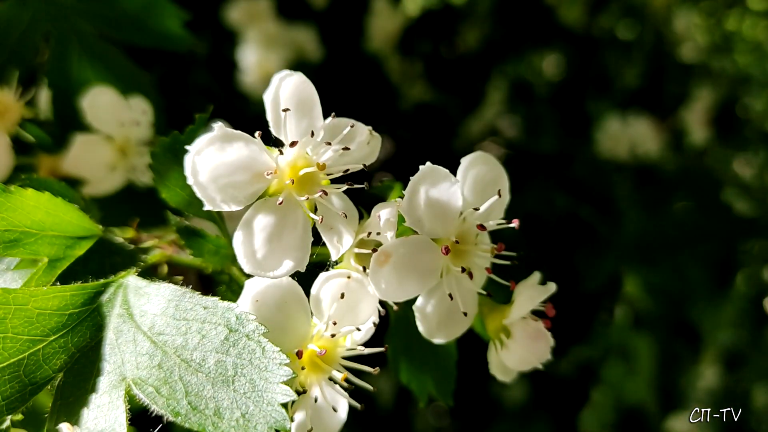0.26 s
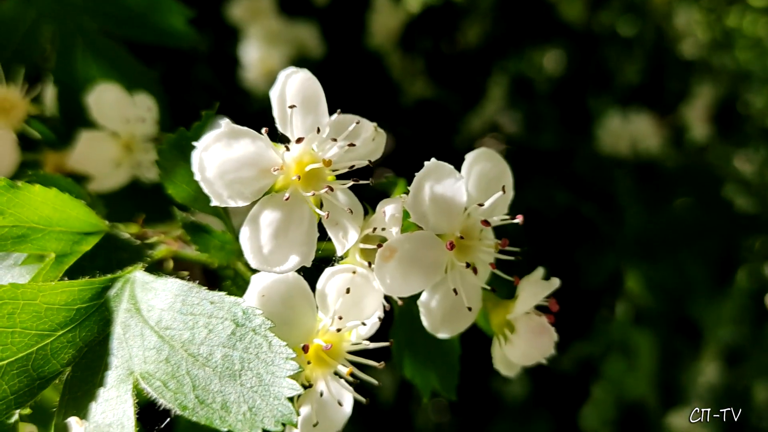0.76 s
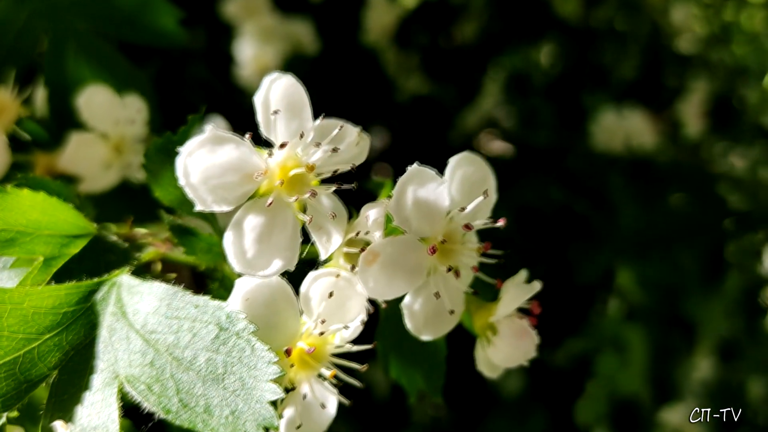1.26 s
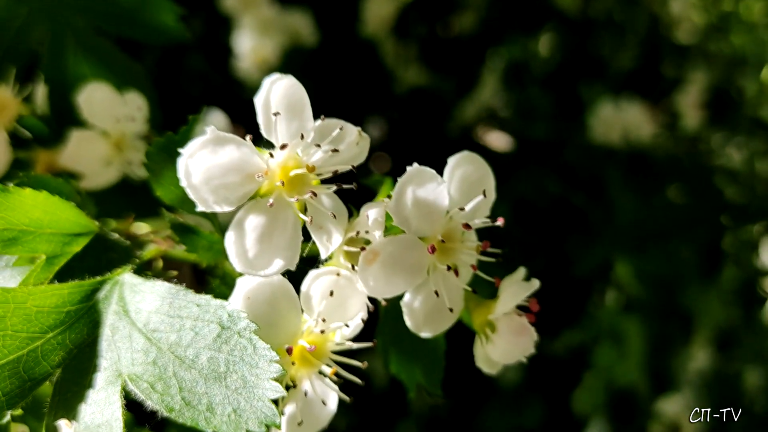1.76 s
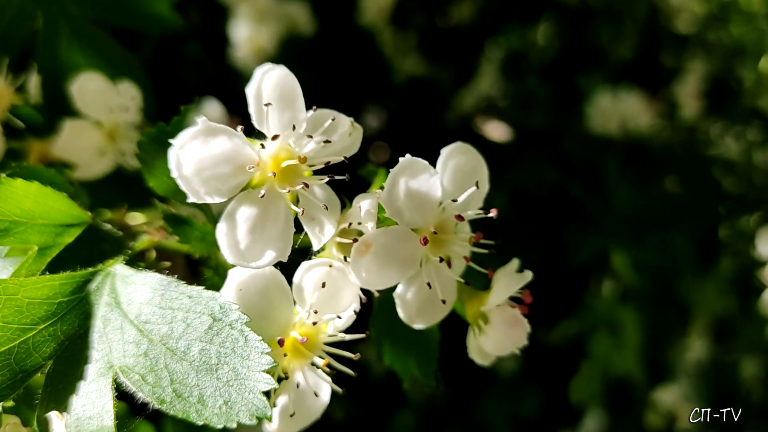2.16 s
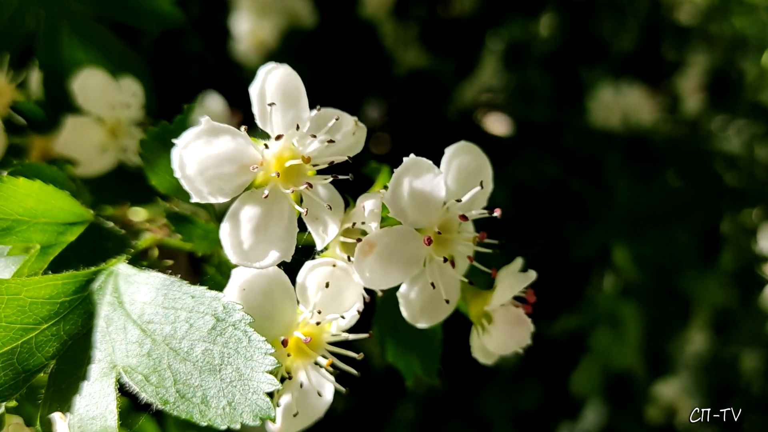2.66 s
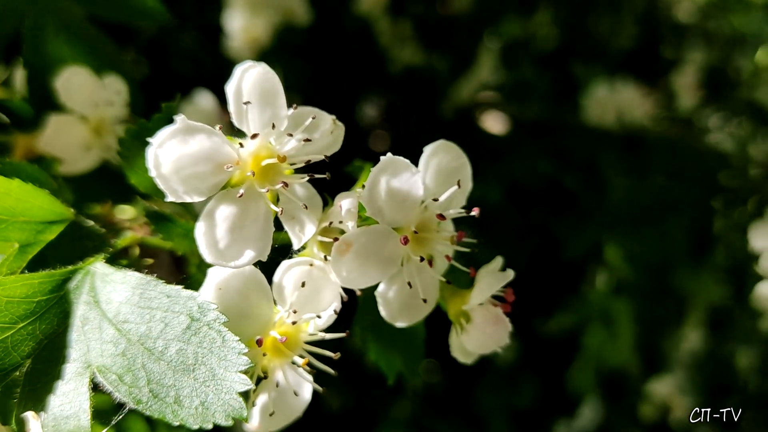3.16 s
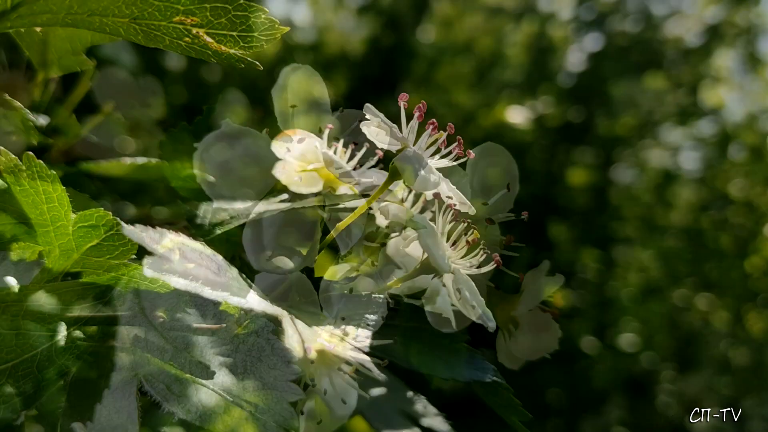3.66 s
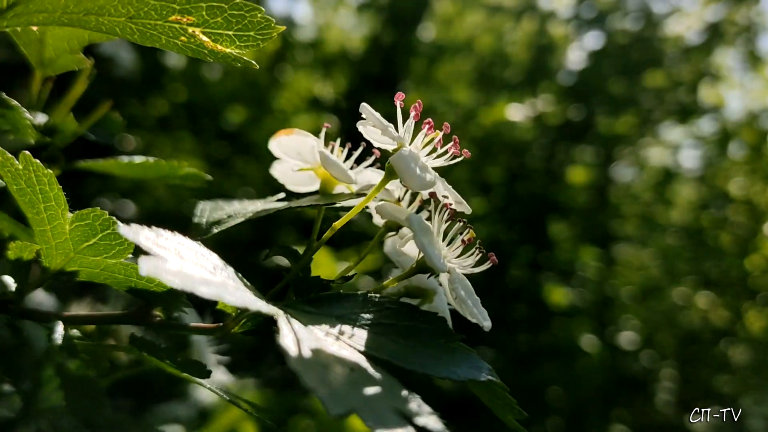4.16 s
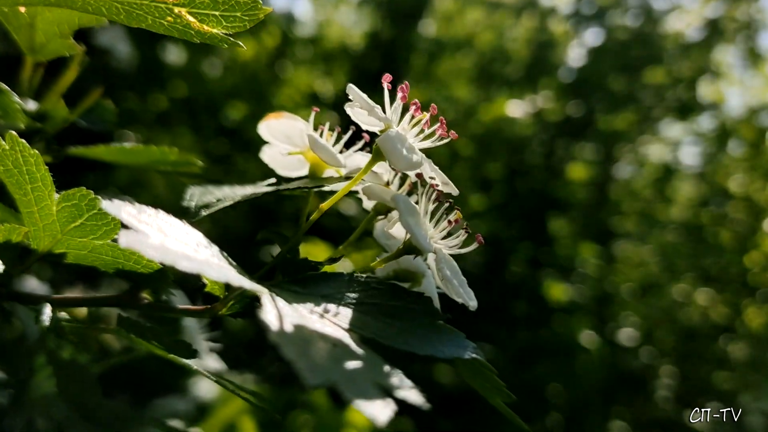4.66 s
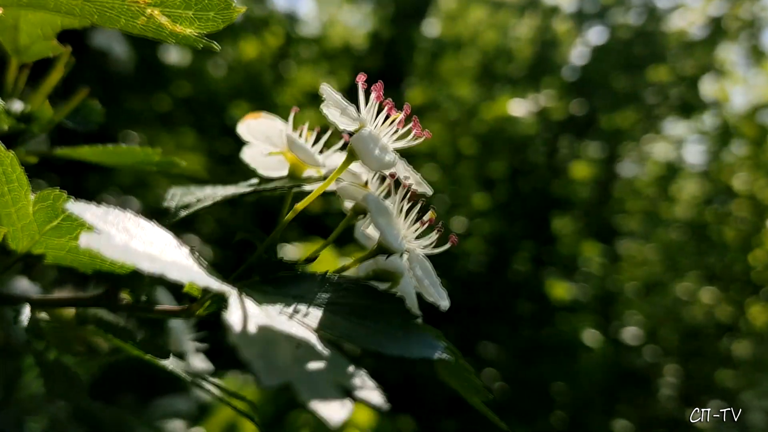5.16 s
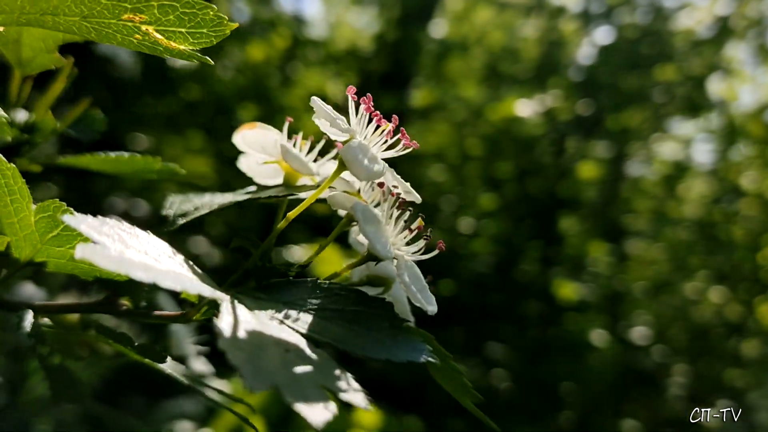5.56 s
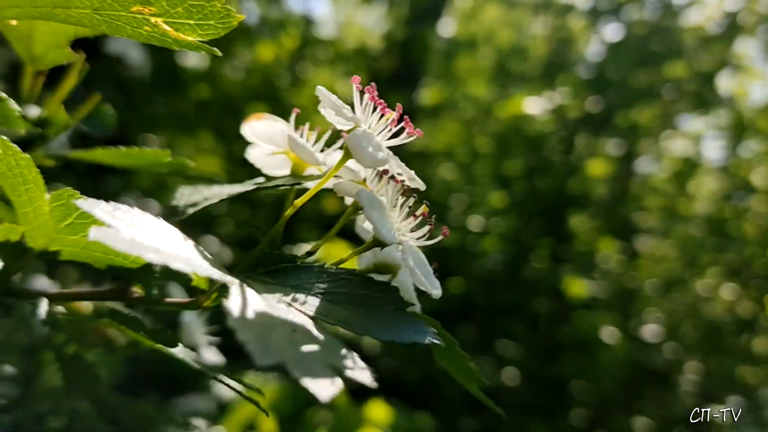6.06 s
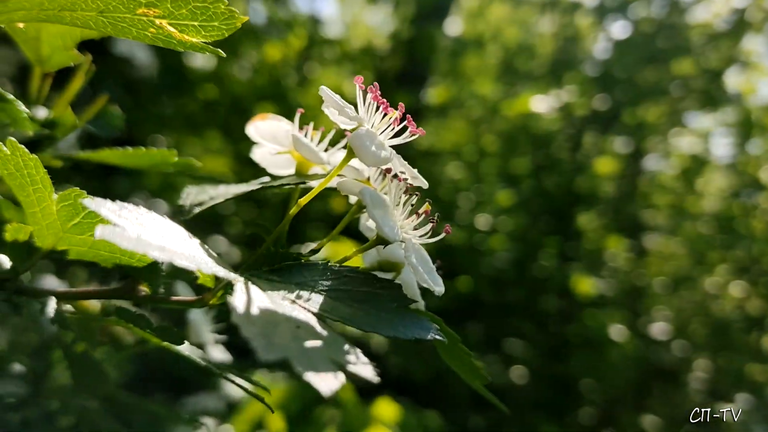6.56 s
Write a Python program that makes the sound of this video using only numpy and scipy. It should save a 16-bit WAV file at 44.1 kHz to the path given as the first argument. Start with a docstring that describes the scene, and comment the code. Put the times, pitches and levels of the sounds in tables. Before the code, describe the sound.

Close stereo outdoor sound: first a bubbling, splashing brook, dense and bright, fading out just after two seconds. Behind it opens a calm woodland with a soft low murmur, a faint distant hum and fine irregular ticking like drops on leaves. A warbling thrush sings quick whistles and buzzy trills with long tree echoes, joined by a few tiny high chips and peeps. Midway, a soft thud hits close on the left.

```python
"""A shallow stream rushes over stones close by: bursts of filtered noise and clicks make its spray and
splashes, decaying rising sines its bubbles and gurgles. It fades away and leaves a quiet wood, where
gliding sines make a warbling thrush and a small peeping bird, and echoes return from the trees.
Random ticks patter over soft noise and a faint, far hum; one fat drop, a sine of sagging pitch,
knocks right beside the left port of the microphone."""
import sys
import numpy as np
from scipy import signal
from scipy.fft import rfft, irfft, next_fast_len
from scipy.io import wavfile

SR = 44100
rng = np.random.default_rng(int(sys.argv[2]) if len(sys.argv) > 2 else 0)


def persist_wave(psi):
    """Save psi, clipped to +-1, as 16-bit WAV."""
    counts = np.round(np.clip(psi, -1, 1) * 32767).astype(np.int16)
    wavfile.write(sys.argv[1], SR, np.atleast_2d(counts).T)


N = 300321
T = np.arange(N) / SR  # time of every sample, s

# still air of the wood: colour [f/Hz, relative level/dB]
AIR_COLOUR = [(12, -31), (20, 7), (32, -3), (75, -0.5), (118, -13), (211, -6), (327, -9.5), (359, -9),
              (557, -12), (611, -13.5), (752, -13.5), (1690, -21), (1850, -19), (2440, -21), (5000, -70),
              (6500, -59), (11000, -120)]
# likeness of the air at the two ports [f/Hz, coherence]
AIR_COHERENCE = [(30, 0.52), (100, 0.99), (300, 0.71), (650, 0.15), (1400, 0), (15000, 0)]
# lean of the air to one port [f/Hz, left minus right/dB]
AIR_LEAN = [(60, 6), (300, 6.5), (700, 4.5), (2400, 3), (6000, 8)]
AIR_DB = -47

# lines of the far hum, before its swell [f/Hz, level/dB rms]
HUM_LINES = [(364, -61.5), (428, -67), (465, -66.5), (578, -68)]
# slow swell of the hum [t/s, gain/dB]
HUM_SWELL = [(2.3, -26), (3.6, -0.5), (4.6, -4), (5.8, 1), (6.8, -0.5)]

# course of the fine patter, before its overall gain [t/s, level/dB]
PATTER_COURSE = [(2.4, -56), (2.78, -53.5), (4.27, -62.5), (5.11, -61.5), (5.89, -61), (6.33, -66.5),
                 (6.8, -61)]
# colour of a drop on a leaf [f/Hz, gain/dB]
LEAF_COLOUR = [(800, -33), (2500, 2), (4500, -3), (6000, 0), (9000, 2), (12000, -4), (15000, -4.5)]
# nearer drops, before their treble filter [t/s, level/dB, left minus right/dB]
NEAR_DROPS = [(3.122, -32, 2.5), (3.3411, -32, -8), (3.627, -31.5, 1), (4.02, -30, 1), (4.143, -33, 9),
              (4.3795, -34, -3), (4.475, -29.5, 20), (4.804, -34.5, 4), (5.117, -35, 3), (5.142, -35, 2.5),
              (5.168, -34, 3), (6.018, -37, 12), (6.045, -30.5, 16), (6.5417, -33, 0)]
PATTER_GAIN_DB = 5
TICK_NOISE_S, TICK_NOISE_DB = 0.007, 3  # a short, soft noise with each tick, gone within milliseconds

KNOCK_S, KNOCK_DB, KNOCK_FADE_DB_PER_S = 4.4762, -22, 582  # the fat drop's thud
KNOCK_FIRST_HZ, KNOCK_LAST_HZ, KNOCK_SAG_S = 506, 151, 0.0027
PLOP_DELAY_S, PLOP_DB, PLOP_HZ = 0.0011, -33, 800  # the air it traps

# the thrush's pure notes, before flutter
# [t/s, length/s, level/dB, first f/Hz, middle f/Hz, last f/Hz]
THRUSH_WHISTLES = [(2.405, .045, -45, 1770, 1830, 1830), (2.582, 0.12, -49, 1880, 1684, 2070),
                   (2.597, .038, -52, 2710, 2780, 2830), (2.672, .04, -45, 2750, 2640, 2500),
                   (2.7, 0.038, -36.5, 2470, 2285, 2110), (2.782, 0.046, -35, 2416, 2310, 2030),
                   (3.019, 0.024, -39, 2130, 1980, 1780), (3.561, 0.092, -51, 1780, 1950, 1980),
                   (3.615, 0.039, -47, 2170, 2350, 2500), (3.645, 0.04, -56, 2470, 2630, 2720),
                   (3.69, 0.058, -51, 2860, 2530, 2170), (3.746, 0.12, -45, 1700, 1906, 1893),
                   (3.942, 0.047, -59, 1870, 1920, 1900), (3.908, 0.026, -54, 2480, 2300, 1950),
                   (3.995, 0.059, -51.5, 2950, 3130, 3020), (4.043, 0.083, -49, 3010, 2915, 2800),
                   (4.132, 0.023, -45.5, 2860, 2760, 2580), (4.235, .04, -43.5, 2270, 2070, 1970),
                   (4.61, 0.029, -42, 2460, 2495, 2600), (4.73, 0.067, -47.5, 2220, 2015, 1710),
                   (4.782, .1, -54, 3330, 3210, 2970), (4.955, 0.22, -51.5, 2060, 1910, 1830),
                   (5.136, 0.027, -42, 1810, 1783, 1870), (5.163, 0.049, -43, 1895, 1982, 1980),
                   (5.221, .045, -51, 1890, 1975, 2160), (5.853, .066, -49, 1724, 1854, 2210),
                   (5.925, .024, -49, 1800, 1890, 2080), (6.018, 0.094, -51.5, 2645, 2175, 1920),
                   (6.097, 0.089, -48.5, 2334, 2270, 2160), (6.17, 0.042, -47, 2250, 2535, 2420),
                   (6.213, .044, -47, 2265, 2204, 2220), (6.268, .035, -55, 2900, 2840, 2800),
                   (6.297, 0.033, -50, 2780, 2680, 2520), (6.326, 0.025, -55, 2720, 2780, 2810),
                   (6.342, 0.052, -43.5, 2354, 2235, 1830), (6.36, 0.039, -52, 2530, 2520, 2450),
                   (6.443, .05, -53.5, 3410, 3300, 3180), (6.537, 0.076, -42, 2455, 2327, 1820),
                   (6.792, .06, -38, 2190, 2380, 2300)]
# its trilled notes, before flutter
# [t/s, length/s, level/dB, first f/Hz, middle f/Hz, last f/Hz, trill/(1/s), swing scale/Hz, pulsing 0-1]
THRUSH_TRILLS = [(2.262, 0.11, -34, 2960, 3035, 2970, 53, 50, 1),
                 (2.372, 0.12, -39, 2890, 2794, 2786, 51, 75, 1),
                 (2.247, 0.14, -44.5, 3530, 3600, 3770, 57, 260, 0.1),
                 (2.475, 0.1, -37, 2800, 2770, 2670, 51, 45, .85),
                 (2.473, 0.11, -48, 1890, 1980, 1910, 48, 70, 0.4),
                 (2.499, 0.11, -44.5, 2230, 2270, 2160, 52, 200, 0.2),
                 (2.732, 0.054, -35.5, 2090, 2195, 2290, 66, 80, .25),
                 (2.908, 0.05, -38, 2285, 2215, 2060, 77, 60, .2),
                 (2.954, 0.068, -38.5, 2100, 2180, 2060, 70, 99, 0.4),
                 (3.941, 0.056, -49.5, 2630, 2650, 2760, 74, 130, .2),
                 (4.21, 0.036, -52, 2570, 2330, 2250, 58, 100, 0),
                 (4.268, 0.14, -45.5, 2020, 2064, 2070, 54, 57, 0.3),
                 (4.635, .12, -38, 2628, 2603, 2596, 44, 99, 0.33),
                 (4.752, 0.17, -43.5, 2590, 2607, 2637, 42, 100, 0.25),
                 (4.852, 0.11, -47, 2105, 1927, 1654, 43, 70, 0.3),
                 (5.276, 0.062, -44.5, 2630, 2560, 2540, 74, 230, 0.1),
                 (5.33, 0.066, -41.5, 2640, 2608, 2390, 67, 157, 0.1),
                 (5.291, 0.087, -46, 2100, 2194, 2160, 65, 150, .3),
                 (5.41, 0.111, -48, 2206, 2094, 2110, 66, 70, 0.05),
                 (5.912, 0.087, -56, 2354, 2200, 2260, 60, 170, 0.2),
                 (6.161, .11, -56, 2500, 2586, 2630, 81, 130, .3),
                 (6.055, 0.065, -59, 2700, 2740, 2600, 58, 170, 0.4),
                 (6.491, .045, -53, 3120, 2980, 2840, 70, 130, 0.3),
                 (6.529, 0.048, -46, 2790, 2710, 2700, 76, 45, 0.3),
                 (6.571, 0.075, -44, 2580, 2466, 2390, 72, 45, .4),
                 (6.602, 0.15, -42.5, 1795, 1863, 1980, 57, 147, 0.33),
                 (6.64, 0.11, -59, 3400, 3630, 3600, 56, 300, 0.2)]
# the small bird's sharp chips [t/s, level/dB]
SMALL_CHIPS = [(2.659, -45.5), (2.756, -47.5), (2.864, -52)]
# its thin peeps [t/s, length/s, level/dB, middle f/Hz]
SMALL_PEEPS = [(3.032, .04, -52, 5880), (3.172, .04, -52, 5880), (3.348, 0.062, -50, 6050),
               (5.16, .03, -57, 5800), (5.165, .028, -60, 6230), (5.238, 0.068, -57, 6310)]
# where the birds sit [t/s, left minus right/dB, echo of the trees/dB]
BIRD_PERCH = [(2.4, 0, -8.5), (3, 9, -14), (4, 8.5, -7), (4.7, 6, -7), (5.4, 4.5, -5), (6.15, -1, -2.5),
              (6.47, 2, -4.5), (6.7, 0.5, 0)]
# single trunks that answer the birds [delay/s, level/dB]
TRUNK_ECHOES = [(.021, -17), (.047, -23.5), (.083, -27)]
CHIP_S, CHIP_FIRST_HZ, CHIP_MIDDLE_HZ, CHIP_LAST_HZ = 0.077, 5700, 7950, 7530  # shoots up, tips over
PEEP_START_BELOW_HZ, PEEP_END_ABOVE_HZ = 165, 82.5  # every peep is a short upward glide
NOTE_ATTACK_S, NOTE_RELEASE_S, NOTE_GROWTH_DB = 0.011, 0.0074, 0.5  # growth over the whole note
FLUTTER_DB, FLUTTER_SHARE = 1.76, 0.0085  # rms shake of the voices in loudness and pitch

# course of the stream, before its surges [t/s, level/dB]
STREAM_COURSE = [(0.0, -17.5), (0.06, -16), (0.31, -17), (0.41, -15), (0.57, -20.5), (0.62, -14),
                 (0.7, -19), (0.76, -14.5), (0.78, -16.5), (1.6, -19), (1.67, -21), (1.88, -22),
                 (1.935, -22.5), (2.22, -32), (2.32, -44.5)]
# colour of the rushing water [f/Hz, gain/dB]
RUSH_COLOUR = [(70, -17), (110, -13.5), (190, -9), (300, -7), (420, -3), (520, -8), (780, 0.5), (1500, 0),
               (2200, 0.5), (2900, -1.5), (4300, -7), (6500, -5.5), (9000, -6), (12000, -10.5),
               (15500, -15)]
# likeness of the stream at the two ports [f/Hz, coherence]
STREAM_COHERENCE = [(60, 0.51), (200, 1), (600, 0.81), (1300, 0.65), (2500, 0.26), (9000, 0.055)]
# lean of the stream to one port [f/Hz, left minus right/dB]
STREAM_LEAN = [(60, 11), (130, 5), (380, 5), (800, 3.5), (1400, 3.5), (2100, -3), (2700, 1), (4000, -2.5),
               (15000, 2.5)]
# sharp splashes, before colouring [t/s, level/dB]
SPLASH_SLAPS = [(.076, 0.5), (0.2, -2), (0.271, -0.5), (.414, -2), (0.441, -5), (.495, -4.5), (.516, 0.5),
                (.744, 2.5), (.962, -3), (1.109, -15), (1.168, -1.5), (1.353, -4), (1.508, -2.5),
                (1.835, -4.5), (1.908, -1.5)]
# air pockets that stand out under the cascades
# [t/s, level/dB, starting f/Hz, upward glide/(share of f per decay time)]
CASCADE_GURGLES = [(.037, -15, 3450, .01), (.038, -10, 3850, .01), (.06, -21, 201, .03),
                   (.098, -11.5, 930, 0.17), (.122, -16.5, 414, 0.033), (.14, -19, 550, 0.036),
                   (.194, -19, 197, .03), (.271, -19.5, 564, .04), (0.335, -18, 332, 0.032),
                   (.355, -10, 2100, .03), (0.428, -10, 2360, 0.026), (.615, -8, 1120, 0.12),
                   (.62, -20.5, 318, .03), (.745, -12.5, 618, 0.13), (0.813, -18.5, 177, 0.018),
                   (.893, -14, 536, 0.19), (0.906, -7, 750, 0.17), (.945, -10, 680, 0.14),
                   (0.961, -19, 187, .02), (1.044, -16.5, 420, .03), (1.125, -24.5, 158, .02),
                   (1.164, -8, 1980, 0.035), (1.212, -19, 806, .1), (1.29, -18, 577, .05),
                   (1.44, -18, 410, .03), (1.49, -21, 216, .03), (1.553, -11, 1530, .05),
                   (1.578, -18, 336, 0.051), (1.736, -27, 187, 0.022), (1.8, -27.5, 162, 0.022),
                   (1.9135, -26, 2190, .02), (2.055, -26, 212, .02), (2.195, -22, 786, 0.053)]
# bubble swarms from deep to fine, before clouding
# [lowest f/Hz, highest f/Hz, rate/(1/s), mean cycles per decay time, level/dB, spread of strengths/dB]
BUBBLE_SWARMS = [(165.5, 501, 80, 8.2, -19.5, 3), (461, 1675, 300, 4.5, -14, 3),
                 (1784, 3300, 480, 9.6, -10, 3.5), (5210, 9530, 600, 13.4, -12.5, 3)]
STREAM_GONE_S = 2.36
PORT_LAG_S = 0.0003615  # the water lies to the right, so the left port hears it late
CLOUD_DB = 2  # rms unevenness of the bubbles
SPLASH_BUBBLE_DB, SPLASH_BUBBLE_HZ, SPLASH_BUBBLE_S = -15, 2500, 0.012  # every slap drives a few under

# response of each microphone port with its cavity resonances [f/Hz, left gain/dB, right gain/dB]
PORT_RESPONSE = [(3600, 0, 0.5), (3750, 0.5, 4), (5100, -0.5, -1), (6820, 0, 2), (7860, 0.5, 10),
                 (8410, 2.5, 7), (8950, 8, -3), (9630, 3.5, -18), (9970, 0.5, -7), (10550, -11.5, -12.5),
                 (11700, -13, -12.5), (15400, -11.5, -10)]
EDGE_HZ = 15750  # upper band limit


def gain_of(db):
    """Decibels to amplitude."""
    return 10 ** (np.asarray(db) / 20)


def evened(x):
    """Scales to rms 1."""
    return x / np.sqrt(np.mean(x ** 2) + 1e-20)


def read(points, hz):
    """Reads a spectrum table on a log-frequency axis."""
    f, value = np.transpose(points)
    return np.interp(np.log(hz + 1), np.log(f + 1), value)


def follow(rows):
    """Reads a time curve at every sample."""
    return np.interp(T, *np.transpose(rows))


def panned(side_db):
    """Left and right gains for a level difference."""
    side_db = np.atleast_1d(side_db)
    return gain_of(np.array([side_db, -side_db]) / 2)


def add(mix, s, sound):
    """Mixes a sound in at time s."""
    start = max(round(s * SR), 0)
    part = mix[..., start:][..., :sound.shape[-1]]
    part += sound[..., :part.shape[-1]]


def coloured(x, gain):
    """Filters by a gain that is a function of frequency."""
    size = next_fast_len(x.shape[-1] + 2048)
    spectrum = rfft(x, size) * gain(np.fft.rfftfreq(size, 1 / SR))
    return irfft(spectrum, size)[..., :x.shape[-1]]


def paired(x, coherence):
    """Makes two unrelated channels alike, band by band."""
    likeness = lambda hz: np.clip(read(coherence, hz), -1, 1)
    shared = coloured(x[0], likeness)
    own = coloured(x[1], lambda hz: np.sqrt(1 - likeness(hz) ** 2))
    return np.array([x[0], shared + own])


def wander(slow_hz, fast_hz):
    """An irregular curve of rms 1: forty sines of random phase between two rates."""
    t, rates = T[::64], np.geomspace(slow_hz, fast_hz, 40)[:, None]
    waves = np.sin(2 * np.pi * (rates * t + rng.random((40, 1))))
    return np.interp(T, t, evened(waves.sum(0)))


def impacts(per_s, spread_db):
    """Random clicks of either sign: many small, a few large."""
    size = gain_of(spread_db * np.minimum(rng.exponential(1, N), 4.5))
    struck = rng.random(N) < per_s / SR
    return size * rng.choice([-1, 1], N) * struck


def bubble(hz, cycles, rise):
    """An air pocket rings, decaying over some cycles; its pitch rises as it nears the surface."""
    u = np.arange(int(4 * cycles * SR / hz) + 2) * hz / (cycles * SR)  # time in decay times
    ring = np.sin(2 * np.pi * cycles * (u + rise * u * u / 2))
    return ring * (1 - np.exp(-6 * u)) * np.exp(-u) * (1 - u / u[-1]) ** 0.5


def scatter(x, t60, gap_s):
    """A diffuse echo: a decaying noise tail of energy 1, different at each port."""
    t = np.arange(SR) / SR
    tail = rng.standard_normal((2, SR)) * gain_of(-60 * t / t60) * (1 - np.exp(-t / gap_s))
    return signal.fftconvolve(np.atleast_2d(x), tail / np.linalg.norm(tail[0]), axes=1)[:, :N]


def air():
    """A low, distant murmur of wind and water: coloured noise, partly alike at both ports."""
    noise = paired(rng.standard_normal((2, N)), AIR_COHERENCE)
    shape = lambda hz: gain_of(read(AIR_COLOUR, hz)) * panned(read(AIR_LEAN, hz))
    return gain_of(AIR_DB) * evened(coloured(noise, shape))


def hum():
    """Faint, far sine lines that waver in level and pitch."""
    lines = np.zeros(N)
    for hz, db in HUM_LINES:
        level = gain_of(db + 3.4 * wander(0.813, 10))
        pitch_hz = hz + 2.86 * wander(0.98, 8.1)
        lines += level * np.sin(2 * np.pi * np.cumsum(pitch_hz) / SR)
    return np.sqrt(2) * lines * gain_of(follow(HUM_SWELL)) * panned(side_db=8.5)


def patter():
    """Fine drops tick on leaves all around, a short, soft noise with each tick; a few fall near."""
    ticks = evened(np.array([impacts(per_s=800, spread_db=4.5) for port in range(2)]))
    keep = np.exp(-1 / (TICK_NOISE_S * SR))
    energy = signal.lfilter([(1 - keep) ** 2], np.poly([keep, keep]), ticks ** 2)
    soft_noise = np.sqrt(energy) * rng.standard_normal((2, N))
    ticks = ticks + gain_of(TICK_NOISE_DB) * soft_noise
    shower_db = follow(PATTER_COURSE) + 1.0 * wander(2.8, 40)  # drops come in little clusters
    fine = evened(coloured(ticks, lambda hz: gain_of(read(LEAF_COLOUR, hz))))
    fine = fine * gain_of(shower_db + PATTER_GAIN_DB) * panned(side_db=0.8)
    near, t = np.zeros((2, N)), np.arange(700) / SR
    snap = np.exp(-t / 0.0019) * (1 - np.exp(-t / 0.0005))
    for s, db, side_db in NEAR_DROPS:
        add(near, s, gain_of(db) * panned(side_db) * snap * rng.standard_normal((2, len(t))))
    # a near drop gives a high, thin tick
    return fine + coloured(near, lambda hz: 1 / (1 + ((hz - 8800) / 2100) ** 2))


def knock():
    """A fat drop strikes by the left port: a dull thud whose pitch sags, and a brief plop."""
    out, t = np.zeros(N), np.arange(0, 0.09, 1 / SR)
    hz = KNOCK_LAST_HZ + (KNOCK_FIRST_HZ - KNOCK_LAST_HZ) * np.exp(-t / KNOCK_SAG_S)
    db = KNOCK_DB - KNOCK_FADE_DB_PER_S * t
    add(out, KNOCK_S, gain_of(db) * np.sin(2 * np.pi * np.cumsum(hz) / SR))
    add(out, KNOCK_S + PLOP_DELAY_S, gain_of(PLOP_DB) * bubble(PLOP_HZ, cycles=2.8, rise=0))
    return out * gain_of([[0], [-24]])  # left, right


def note(waver, s, length, db, first_hz, middle_hz, last_hz, trill=0, swing_hz=0, pulsing=0):
    """An arched, slightly unsteady whistle; a trill lifts its pitch and loudness on every beat."""
    t = np.arange(0, length, 1 / SR)
    arch = np.polyval(np.polyfit([0, 0.5, 1], [first_hz, middle_hz, last_hz], 2), t / length)
    beat = np.abs(np.sin(np.pi * trill * t))
    hz = (arch + swing_hz * (np.pi * beat - 2)) * np.interp(s + t, T, waver)
    edges = np.clip(np.minimum(t / NOTE_ATTACK_S, (length - t) / NOTE_RELEASE_S), 0, 1)
    pulse = 1 - np.clip(pulsing, 0, 1) * (1 - beat ** 4)
    loud = gain_of(db + NOTE_GROWTH_DB * t / length) * pulse * np.sin(np.pi / 2 * edges) ** 2
    return s, loud * np.sin(2 * np.pi * np.cumsum(hz) / SR)


def birds():
    """The thrush whistles and trills, the small bird chips and peeps; the trees throw it all back."""
    voice, small = np.zeros(N), np.zeros(N)
    waver = 1 + FLUTTER_SHARE * wander(30, 200)
    for row in THRUSH_WHISTLES + THRUSH_TRILLS:
        add(voice, *note(waver, *row))
    for s, db in SMALL_CHIPS:
        add(small, *note(waver, s, CHIP_S, db, CHIP_FIRST_HZ, CHIP_MIDDLE_HZ, CHIP_LAST_HZ))
    for s, length, db, hz in SMALL_PEEPS:
        add(small, *note(waver, s, length, db, hz - PEEP_START_BELOW_HZ, hz, hz + PEEP_END_ABOVE_HZ))
    # the small bird sits deep in the leaves
    voice += small / 2 + gain_of(-5) * scatter(small, t60=0.12, gap_s=0.0018)[0]
    voice *= gain_of(FLUTTER_DB * wander(25, 120))
    s, side_db, echo_db = np.transpose(BIRD_PERCH)
    direct = np.array([voice, np.roll(voice, round(0.00039 * SR))])  # later at the right port
    trunks = gain_of(-10) * scatter(voice, t60=0.09, gap_s=0.002)
    for delay_s, db in TRUNK_ECHOES:
        add(trunks, delay_s, gain_of(db) * direct)
    wood = scatter(voice * gain_of(np.interp(T, s, echo_db)), t60=0.87, gap_s=0.0048)
    return (gain_of(-4.0) * direct + trunks + wood) * panned(np.interp(T, s, side_db))


def spray():
    """Countless droplets burst on the stones; the body and the treble surge each in their own way."""
    clicks = np.array([impacts(per_s=7000, spread_db=2.5) for port in range(2)])
    drops = paired(evened(clicks), STREAM_COHERENCE)
    body = coloured(drops, lambda hz: 1 / (1 + (hz / 3800) ** 4))
    body_db, treble_db = 0.57 * wander(6.2, 60), 0.27 * wander(35, 150)
    surging = body * gain_of(body_db) + (drops - body) * gain_of(treble_db)
    return evened(coloured(surging, lambda hz: gain_of(read(RUSH_COLOUR, hz))))


def fizz(low_hz, high_hz, per_s, cycles, spread_db, count):
    """A swarm of bubbles of many sizes, each at its own depth and its own place between the banks."""
    out = np.zeros((2, N))
    draws = rng.random((count, 6))[:int(per_s * STREAM_GONE_S)]
    for size, loud, when, place, lag, depth in draws:
        hz = low_hz * (high_hz / low_hz) ** size
        db = spread_db * min(-np.log(loud), 3.2) + read(RUSH_COLOUR, hz)
        ring = gain_of(db) * bubble(hz, cycles * (0.5 + depth), rise=0.178 * (1 - depth))
        side = (place - 0.5) * min(hz / 1500, 1.3)  # only short waves are shaded from one port
        s = when * STREAM_GONE_S
        add(out[0], s + (lag - 0.5) * 0.00038, ring * (1 + side))
        add(out[1], s, ring * (1 - side))
    return out / np.std(out[:, T < STREAM_GONE_S])


def splashes():
    """Short slaps of water against a stone, each with a spatter of small bubbles."""
    bursts, spatter, t = np.zeros((2, N)), np.zeros((2, N)), np.arange(2000) / SR
    slap = np.exp(-t / 0.0035) * (1 - np.exp(-t / 0.0004))
    for s, db in SPLASH_SLAPS:
        add(bursts, s, gain_of(db) * slap * rng.standard_normal((2, len(t))))
        for when, octave, place in rng.random(size=(4, 3)):
            ring = bubble(SPLASH_BUBBLE_HZ * 2 ** (octave - 0.5), cycles=10.3, rise=0.067)
            gains = gain_of(db + SPLASH_BUBBLE_DB) * panned(side_db=21 * (place - 0.5))
            add(spatter, s + when * SPLASH_BUBBLE_S, gains * ring)
    shape = lambda hz: gain_of(read(RUSH_COLOUR, hz)) * hz / (hz + 700)
    return spatter + coloured(paired(bursts, STREAM_COHERENCE), shape)


def stream():
    """Spray and ringing bubbles follow the flow; gurgles and splashes stand out of it."""
    water = gain_of(-0.5) * spray()
    for low_hz, high_hz, per_s, cycles, db, spread_db in BUBBLE_SWARMS:
        cloud_db = db + CLOUD_DB * wander(8, 45)  # bubbles of a size are pulled under in clouds
        water += gain_of(cloud_db) * fizz(low_hz, high_hz, per_s, cycles, spread_db, count=2500)
    # spray and bubbles come in the same rushes
    surge_db = 0.64 * wander(5, 40) + 0.14 * wander(40, 200)
    fade = np.clip((STREAM_GONE_S - T) / 0.048, 0, 1)
    water *= gain_of(follow(STREAM_COURSE) + surge_db + 0.79) * fade
    for s, db, hz, rise in CASCADE_GURGLES:
        add(water, s, gain_of(db) * bubble(hz, cycles=4 * np.sqrt(hz / 200), rise=rise))
    lag = np.array([[PORT_LAG_S], [0]])
    at_ports = lambda hz: panned(read(STREAM_LEAN, hz)) * np.exp(-2j * np.pi * hz * lag)
    return coloured(water + splashes(), at_ports)


def scene():
    """The stream close by, and the wood behind it."""
    return stream() + air() + hum() + patter() + knock() + birds()


def record(dry):
    """The ports ring in the treble; peaks stop at full scale; then the band limit."""
    ports = np.array(PORT_RESPONSE)
    heard = coloured(dry, lambda hz: gain_of([read(ports[:, :2], hz), read(ports[:, ::2], hz)]))
    lowpass = signal.firwin(511, EDGE_HZ, window=("kaiser", 9), fs=SR)
    return signal.oaconvolve(np.clip(heard, -1, 1), lowpass[None], "same")


dry = scene()
out = record(dry)
persist_wave(out)
```